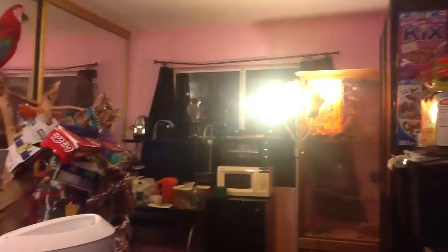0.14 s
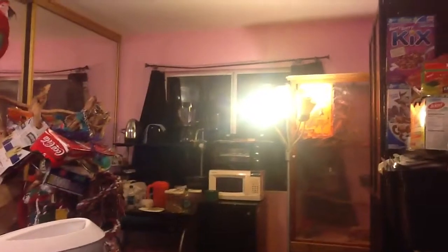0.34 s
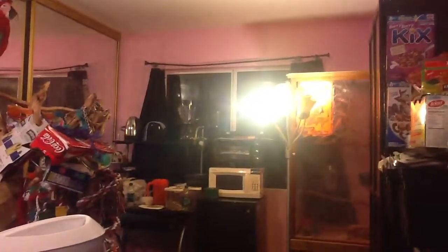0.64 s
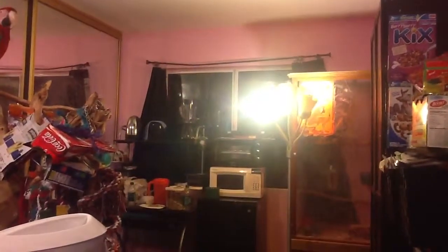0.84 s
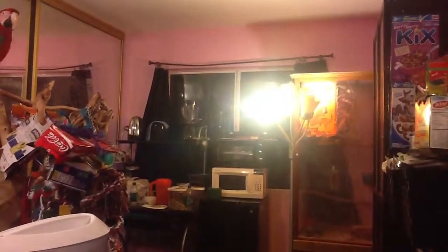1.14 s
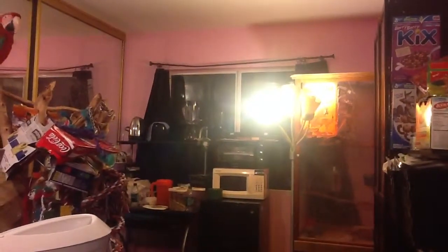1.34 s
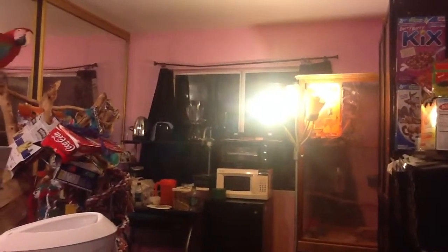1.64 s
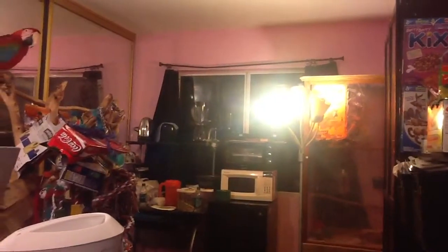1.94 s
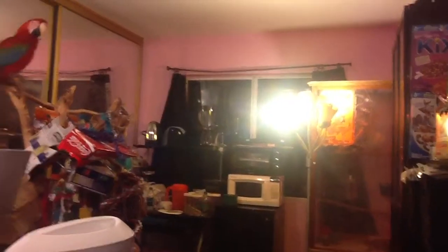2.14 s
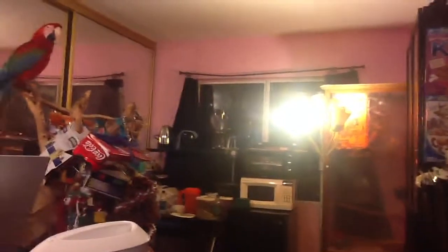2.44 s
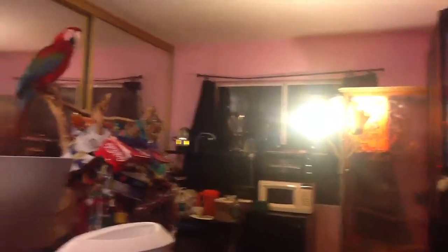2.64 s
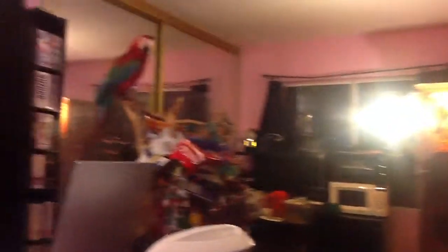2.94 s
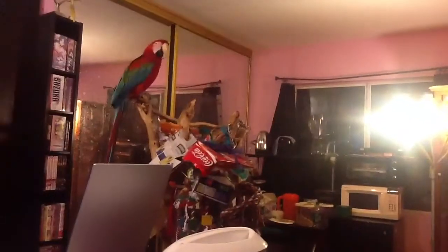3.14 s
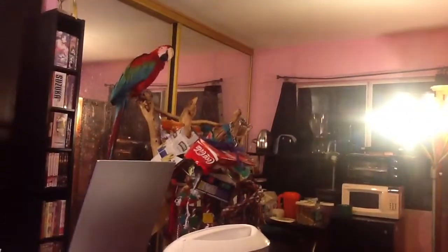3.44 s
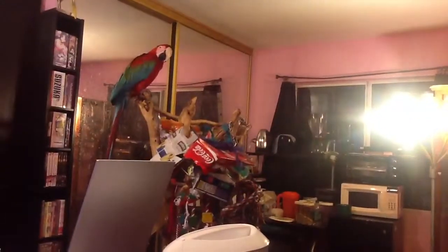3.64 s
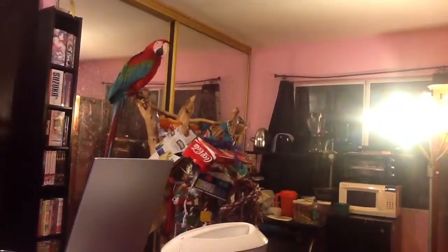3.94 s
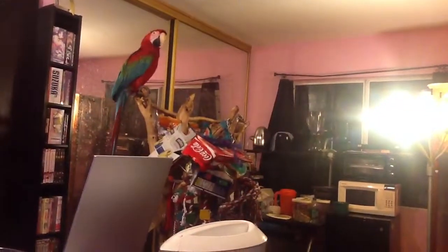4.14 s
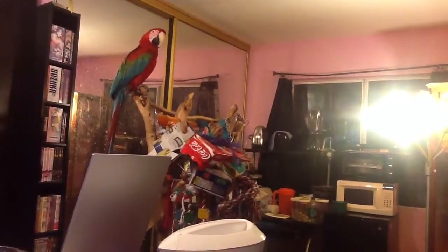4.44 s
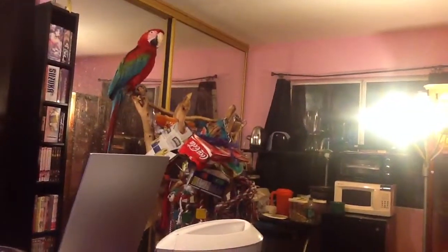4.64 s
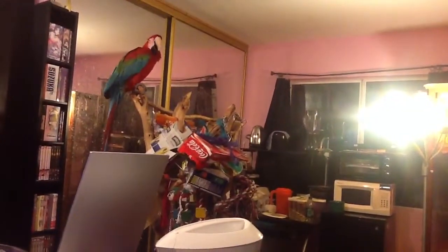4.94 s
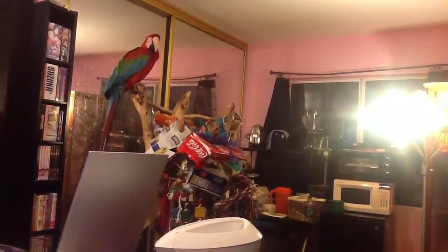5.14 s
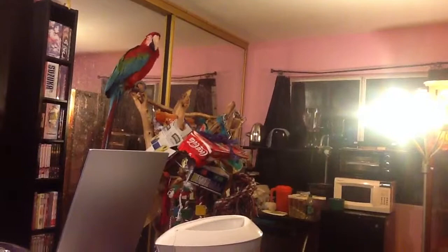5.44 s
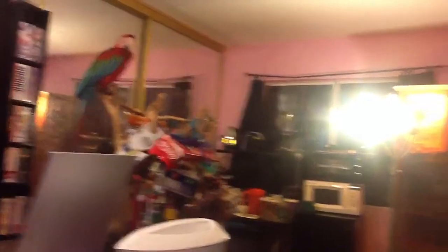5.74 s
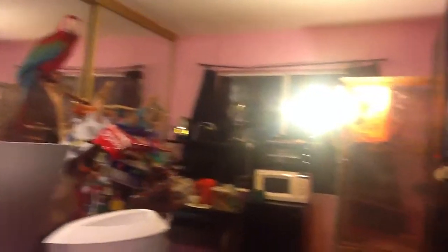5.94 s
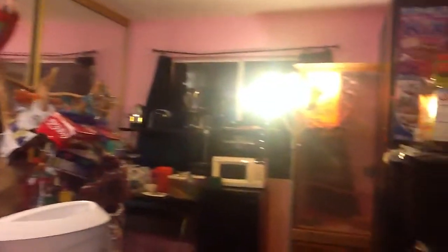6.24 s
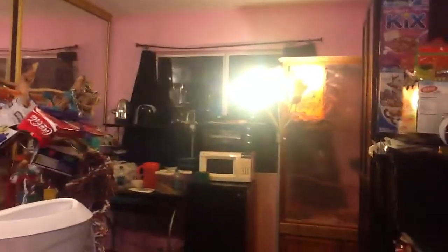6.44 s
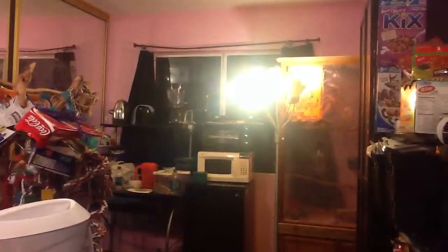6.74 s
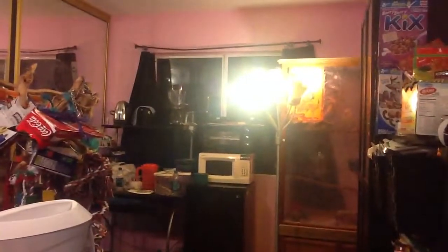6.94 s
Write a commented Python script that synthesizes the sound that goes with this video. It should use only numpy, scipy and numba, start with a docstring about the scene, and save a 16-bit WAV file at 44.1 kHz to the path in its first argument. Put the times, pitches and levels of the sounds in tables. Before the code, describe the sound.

Parrot calls heard indoors from a few metres away: first a long, harsh, overdriven scream, then a loud quick call sweeping up and down. Quiet room noise holds for over a second, then a weaker nasal whoop, another pair of calls nearly overlapping, and a louder last call. The room is small and reverberant with a short tail. A low, constant appliance drone continues, with a few barely audible ticks.

```python
"""Parrots calling in a small room

One long harsh screech with a thin clear start, then short clear calls that mostly glide up and down.
Screech: uneven slaps and noise ring throat resonances. Calls: gliding overtones shaped by throat and beak.
Dense decaying reflections smear the birds and a few faint ticks; steady appliance noise drones below."""
import sys
import numpy as np
from scipy import signal
from scipy.fft import rfft, irfft
from scipy.io import wavfile
from scipy.ndimage import uniform_filter1d, minimum_filter1d
from numba import njit

SR = 44100
rng = np.random.default_rng(int(sys.argv[2]) if len(sys.argv) > 2 else 0)


def waveform_to_disk(signal):
    """Save audio, clipped to [-1, 1], as 16-bit WAV at the path in sys.argv[1]."""
    frames = np.transpose(np.atleast_2d(signal))
    scaled = np.clip(frames, -1, 1) * 32767
    samples = np.round(scaled).astype(np.int16)
    wavfile.write(sys.argv[1], SR, samples)


N = 312757
CUTOFF_HZ = 15450


def amp(db):
    """Decibels to gain."""
    return 10 ** (np.asarray(db) / 20)


def rms_one(x):
    """Scale to unit rms."""
    return x / np.sqrt(np.mean(x ** 2) + 1e-20)


def at_hz(points, hz):
    """Read a (Hz, value) table on a log-frequency axis."""
    points = np.array(points)
    return np.interp(np.log(np.maximum(hz, 1)), np.log(points[:, 0]), points[:, 1])


def in_time(rows):
    """First sample of a table and its columns interpolated sample by sample."""
    s, *columns = np.transpose(rows)
    at = np.arange(round(s[0] * SR), round(s[-1] * SR))
    return at[0], [np.interp(at / SR, s, column) for column in columns]


def fade(count, seconds):
    """Linear fade in and out."""
    k = np.arange(count)
    return np.clip(np.minimum(k, count - k) / (seconds * SR), 0, 1)


def drift(count, rate_hz):
    """Unit-rms random wander: noise through a two-pole low-pass."""
    r = np.exp(-2 * np.pi * rate_hz / SR)
    settle = 4000
    noise = rng.standard_normal(count + settle)
    return rms_one(signal.lfilter([1], [1, -2 * r, r * r], noise)[settle:])


def filtered(x, order, hz, kind):
    """Butterworth filter."""
    return signal.sosfilt(signal.butter(order, hz, kind, fs=SR, output="sos"), x)


@njit
def resonate(x, hz, r, sr):
    """Two-pole resonance with a moving centre, gain about 1 at the peak."""
    y = np.zeros(len(x))
    for i in range(2, len(x)):
        drive = (1 - r * r) / 2 * (x[i] - x[i - 2])
        y[i] = drive + 2 * r * np.cos(2 * np.pi * hz[i] / sr) * y[i - 1] - r * r * y[i - 2]
    return y


def resonance(x, hz, width_hz):
    """Resonance given by centre and width."""
    return resonate(x, hz + np.zeros(len(x)), np.exp(-np.pi * max(width_hz, 10) / SR), float(SR))


def drone():
    """Steady appliance noise with a few housing resonances, and a motor whine of slowly wavering level."""
    # Noise spectrum. Each row: frequency in Hz, relative density in dB per Hz.
    spectrum = [(15, -72), (25, -62), (109, -20.5), (160, -15), (210, -9.5), (290, -10), (335, -18.5),
                (637, -21.5), (769, -17), (1000, -22), (1090, -22.5), (1670, -21.5), (4380, -34),
                (15000, -40.5)]
    # Housing resonances. Each row: centre in Hz, width in Hz, lift in dB.
    housing = [(188, 25, 7), (246, 32, 9), (360, 20, 11), (764, 210, 3), (1638, 130, 1)]
    whine_hz, whine_db, noise_rms_db = 1035, -66.5, -53.5
    hz = np.fft.rfftfreq(N, 1 / SR)
    lift_db = sum(db / (1 + (2 * (hz - centre) / width) ** 2) for centre, width, db in housing)
    whine = amp(whine_db + 1.1 * drift(N, 3.0)) * np.sin(2 * np.pi * whine_hz * np.arange(N) / SR)
    shaped = rfft(rng.standard_normal(N)) * amp(at_hz(spectrum, hz) + lift_db)
    return whine + amp(noise_rms_db) * rms_one(irfft(shaped, N))


def ticks():
    """Faint ticks: decaying noise bursts through one broad bright resonance."""
    # Each row: start in seconds, peak level ahead of the room in dB.
    tick_rows = [(0.341, -52), (2.4994, -60), (4.4994, -47), (5.5438, -41.5), (6.5455, -47)]
    centre_hz, width_hz, decay_s = 6800, 7400, .002
    out, t = np.zeros(N), np.arange(800) / SR
    for s, db in tick_rows:
        puff = resonance(rng.standard_normal(len(t)) * np.exp(-t / decay_s), centre_hz, width_hz)
        start = round(s * SR)
        out[start:start + len(t)] = amp(db) * puff / np.max(np.abs(puff))
    return out


def screech_opening():
    """Thin clear start of the screech: a rising tone and a throat resonance whistling along with it."""
    # Each row: time in seconds, pitch in Hz, tone level in dB.
    opening_rows = [(.45, 960, -66), (.475, 1000, -45.5), (.51, 1000, -42.5), (.54, 1040, -53)]
    ring_hz, ring_db = 3865, -8.5
    start, (hz, level_db) = in_time(opening_rows)
    count = len(hz)
    tone = np.sin(2 * np.pi * np.cumsum(hz) / SR)
    ring = np.sin(2 * np.pi * ring_hz * np.arange(count) / SR)
    level = amp(level_db) * fade(count, .01) * amp(3.0 * drift(count, 60.0))
    out = np.zeros(N)
    out[start:start + count] = level * (tone + amp(ring_db) * ring)
    return out


def screech():
    """Overdriven membranes slap at uneven intervals and strengths; the throat rings after each slap."""
    # Each row: time in seconds, level in dB, level of the treble against the body in dB.
    screech_rows = [(0.46, -60, -5.5), (0.5, -37.5, -19), (0.536, -22.5, -30), (0.576, -11.5, -20.5),
                    (0.726, -10, -16), (0.836, -11.5, -13.5), (0.99, -15, -16), (1.1, -15.5, -14.5),
                    (1.202, -19.5, -16.5), (1.27, -41, -43)]
    # Drifting throat resonances. Each row: first centre in Hz, last centre in Hz.
    throat_paths = [(1480, 1458), (2730, 2800), (3800, 3910), (5250, 5480)]
    # The same resonances. Each row: width of the sharper stage in Hz, relative level in dB.
    throat_rows = [(110, -5), (220, 0), (400, -6), (550, -5)]
    # Fixed resonances. Each row: centre in Hz, width of the sharper stage in Hz, relative level in dB.
    fixed_rows = [(640, 120, -31), (2200, 560, -21), (7393, 1200, -7)]
    slap_hz, slap_jitter, slap_spread_db, rasp_db = 1344.5, .3, 5, -9.5
    flutter_db, flutter_hz, wander_share = 1.8, 60, .012

    start, (level_db, treble_db) = in_time(screech_rows)
    count = len(level_db)
    luck = rng.standard_normal((count // 16, 2))
    at = np.cumsum(SR / slap_hz * np.exp(slap_jitter * luck[:, 0])).astype(int)
    inside = at < count
    slaps = np.zeros(count)
    slaps[at[inside]] = amp(slap_spread_db * luck[inside, 1])
    drive = rms_one(slaps - slaps.mean()) + amp(rasp_db) * rng.standard_normal(count)
    drive = drive * amp(flutter_db * drift(count, flutter_hz))

    body = np.zeros(count)
    for k, ((first_hz, last_hz), (width_hz, db)) in enumerate(zip(throat_paths, throat_rows)):
        centre_hz = np.linspace(first_hz, last_hz, count) * (1 + wander_share * drift(count, 4.2))
        ringing = resonance(resonance(drive, centre_hz, width_hz), centre_hz, 15.0 * width_hz)
        body += (-1) ** k * amp(db) * rms_one(ringing)   # alternating polarity
    body = filtered(body, 3, 1200, "high")   # little escapes below the first resonance
    low, middle, high = [amp(db) * rms_one(resonance(resonance(drive, hz, width_hz), hz, 2 * width_hz))
                         for hz, width_hz, db in fixed_rows]
    # air forced through the gap
    hiss = rms_one(filtered(rng.standard_normal(count), 2, [6500, 11800], "band"))
    voice = rms_one(body + low + middle) + amp(treble_db) * (high + amp(-6.0) * hiss)
    out = np.zeros(N)
    out[start:start + count] = voice * amp(level_db) * fade(count, 0.022)
    return out + screech_opening()


def whoop(rows, throat_hz, beak_hz, top_hz, top_db, treble_db, fundamental_db, swell_db):
    """Membrane vibration: overtones shaped by a throat resonance and one that grows as the beak opens."""
    # Colour of head and beak. Each row: frequency in Hz, gain in dB.
    head_colour = [(250, 6), (500, -4.5), (1000, 0.5), (2000, 1.5), (3000, 1), (4500, -2), (5400, -2.5),
                   (6400, -12), (7500, -15.5), (9500, -23.5), (11000, -6.5), (13000, -17), (15000, -31)]
    throat_half_width_hz, beak_half_width_hz, top_half_width_hz = 446, 450, 390
    waver_share, hoarse_db, taut_hz = .016, -13, 850
    swell_s = 0.024

    start, (pitch_hz, level_db, opening, slope_db) = in_time(rows)
    count = len(pitch_hz)
    # beak shut, beak wide open
    throat_db = np.interp(opening, [0, 1], [23.8, 3.4])
    beak_db = np.interp(opening, [0, 1], [2.5, 16.45])
    first_db = np.interp(opening, [0, 1], [-5.5, -0.8])

    # slack membranes vibrate unevenly, taut ones clearly
    slack = np.clip(2 - 2 * pitch_hz / taut_hz, .15, 1)
    wavering_hz = pitch_hz * (1 + waver_share * slack * drift(count, 89))
    turn = 2 * np.pi * np.cumsum(wavering_hz) / SR
    order = np.arange(1, 41)[:, None]
    hz = order * pitch_hz

    cavities = [(throat_db, throat_hz, throat_half_width_hz), (beak_db, beak_hz, beak_half_width_hz),
                (top_db, top_hz, top_half_width_hz)]
    lift_db = sum(db / (1 + ((hz - centre) / width) ** 2) for db, centre, width in cavities)
    lift_db = lift_db + treble_db * np.clip(2 * np.log2(hz / 8000), 0, 1)
    gains = amp(slope_db * np.log2(order) + lift_db + at_hz(head_colour, hz)) * (hz < CUTOFF_HZ)
    past_top = np.clip((np.arange(count) - np.argmax(pitch_hz)) / (swell_s * SR), 0, 1)
    gains[0] *= amp(first_db + fundamental_db + swell_db * past_top)
    gains = gains / np.sqrt(np.sum(gains ** 2, axis=0) / 2)   # unit power at every moment

    # uneven cycles blur the overtones, the higher the more
    uneven = np.array([drift(count, 250) for _ in range(3)])[order[:, 0] % 3]
    blur = 1 + amp(hoarse_db) * slack * uneven * np.sqrt(order)
    voice = np.sum(gains * blur * np.sin(order * turn), axis=0)
    out = np.zeros(N)
    out[start:start + count] = voice * amp(level_db) * fade(count, 0.0043)
    return filtered(out, 4, 220, "high")   # keeps rumble from the overtone blur out of the call


def room(x):
    """Direct sound plus dense reflections: octave bands of noise, each with its own decay."""
    # Each row: frequency in Hz, time to fall 60 dB in seconds.
    decay_rows = [(200, 0.3153), (600, 0.24), (1500, 0.31), (4000, 0.29), (8000, 0.28), (15000, 0.27)]
    wet_db, first_echo_s = 7, 0.0023   # reverberant against direct
    t, tail = np.arange(SR // 2) / SR, 0
    white = rng.standard_normal(SR // 2)
    for low_hz in 88 * 2. ** np.arange(8):
        band = filtered(white, 2, [low_hz, min(2 * low_hz, .45 * SR)], "band")
        t60_s = at_hz(decay_rows, low_hz * np.sqrt(2))
        tail = tail + band * amp(-60 * t / t60_s)
    tail = tail * np.clip(t / first_echo_s - 1, 0, 1)
    wet = signal.fftconvolve(x, tail / np.sqrt(np.sum(tail ** 2)))[:N]
    return (x + amp(wet_db) * wet) / np.sqrt(1 + amp(2 * wet_db))


def scene():
    """Birds and ticks in the room, over the drone."""
    # Clear calls, one table each. Each row: time in seconds, pitch in Hz, level in dB, beak opening 0-1,
    # pressing of the membranes as overtone slope in dB per octave.
    calls = [
        [(1.455, 327, -52, 0.5, -11.5), (1.478, 355.2, -31.5, 0.3, -5), (1.51, 411.6, -22.5, 0.57, -5),
         (1.55, 460, -20.5, 0.33, -3.5), (1.585, 602, -16, 0.37, -5.5), (1.618, 815, -11, 0.76, 1),
         (1.646, 897.3, -13, .95, 1), (1.685, 881, -18.5, 0.95, -2), (1.722, 728, -29, 0.65, -4),
         (1.8, 318, -42, 1, 0)],
        [(3.28, 335.3, -51.5, 0.5, -6.5), (3.32, 340, -36, 0, -8.5), (3.368, 437, -32.5, .05, -5),
         (3.42, 517, -28.5, 0.28, -5.5), (3.474, 591.7, -25.5, 0.35, -7.5), (3.516, 609.4, -26.5, 0.83, -4),
         (3.54, 525.5, -26.5, 1, -6.5), (3.58, 409, -36.5, 1, -6), (3.63, 288, -46.5, 0.7, -9)],
        [(4.83, 295.5, -53, 0.3, -5.5), (4.868, 307.5, -39, 0.14, -9.5), (4.936, 445.5, -31, 0.1, -7),
         (4.97, 470, -31, 0.03, -4), (4.996, 578.5, -31, 0.54, -11.5), (5.038, 668.5, -21.5, 0.37, -4.5),
         (5.086, 570, -25, 0.72, -4.5), (5.13, 430.6, -38, 1, -4.5), (5.18, 286, -41, 0.7, -7.5)],
        [(5.93, 306, -51, 0.54, -9), (5.966, 330.1, -34, 0.07, -8), (6.024, 505, -27.5, 0.22, -4.5),
         (6.07, 730, -20.5, 0.23, -7.5), (6.096, 804, -19.5, 0.55, -1.5), (6.146, 878.5, -21, 0.67, -3),
         (6.2, 729, -17.5, .75, 0), (6.222, 618.5, -21.5, 0.87, -0.1), (6.29, 293.4, -41.5, 1, -0.2)],
        [(5.13, 523, -33.5, 0.78, -1), (5.198, 573, -30.5, 0.18, 2.5), (5.252, 573.5, -27.5, 0.9, 2.6),
         (5.282, 549.5, -42, 0.86, -7), (5.32, 416, -32.5, 1, 1)],
    ]
    # Posture, one row per call: throat, beak and top resonance in Hz, lift of the top one in dB,
    # treble gain in dB (from 8 kHz, full half an octave up), fundamental gain in dB,
    # its further change in dB once the pitch has peaked.
    postures = [(1516, 2700, 7100, 10.5, -7.5, -1.5, 11), (1317, 2810, 6500, 7, -5, 0.5, -3.5),
                (1326, 2760, 5900, -6, -7, -1.5, 5), (1430, 2960, 4400, 3, -9.5, 2.5, 13.5),
                (1630, 2740, 6300, 7.5, -14, 15, -16)]
    birds = screech() + sum(whoop(rows, *posture) for rows, posture in zip(calls, postures))
    return (room(birds + ticks()) + drone())[None]


def record(dry):
    """A limiter turns down any peaks above its ceiling; a steep low-pass cuts the top."""
    ceiling, limiter_s = .75, .004
    span = round(limiter_s * SR)
    needed = np.minimum(1, ceiling / (np.abs(dry) + 1e-9))
    gain = uniform_filter1d(minimum_filter1d(needed, size=2 * span), size=span)
    return signal.sosfilt(signal.cheby2(16, 70, CUTOFF_HZ, fs=SR, output="sos"), gain * dry)


dry = scene()
out = record(dry)
waveform_to_disk(out)
```